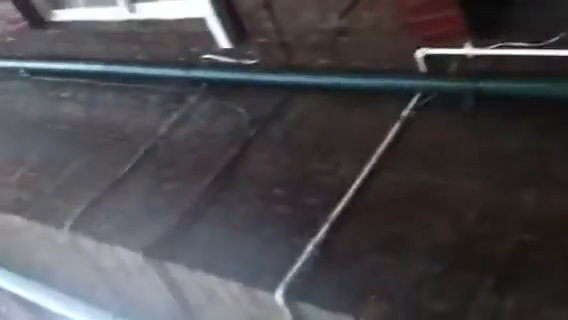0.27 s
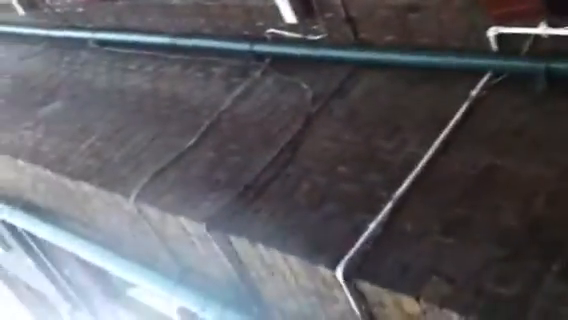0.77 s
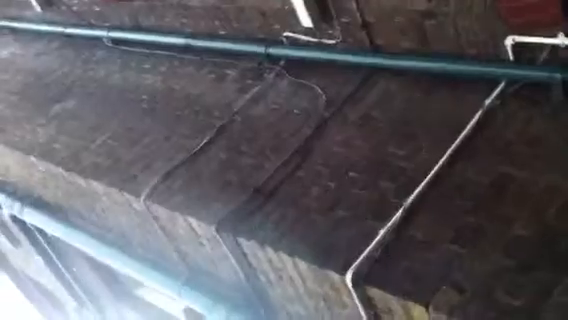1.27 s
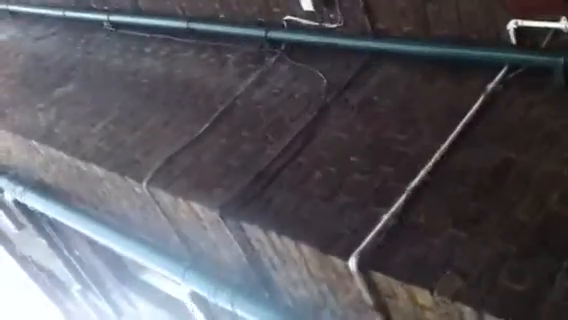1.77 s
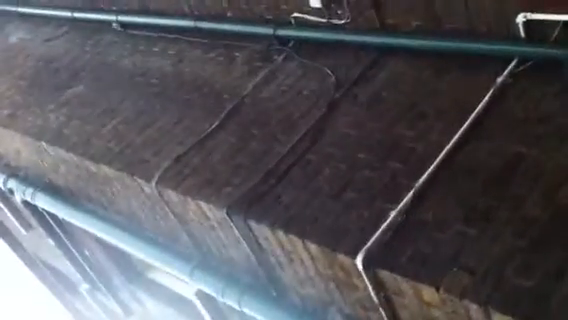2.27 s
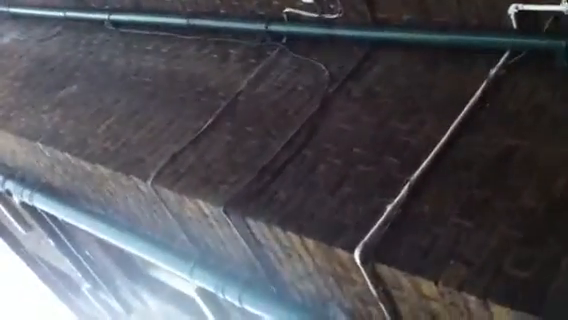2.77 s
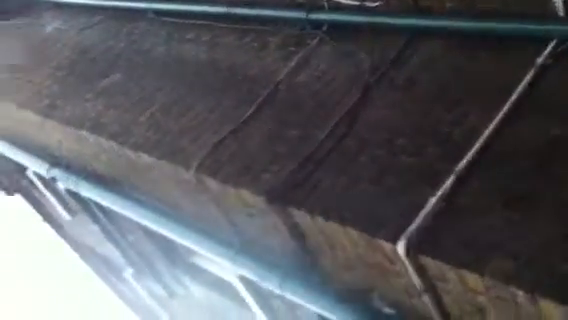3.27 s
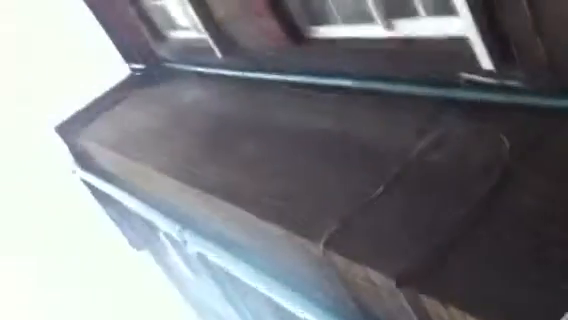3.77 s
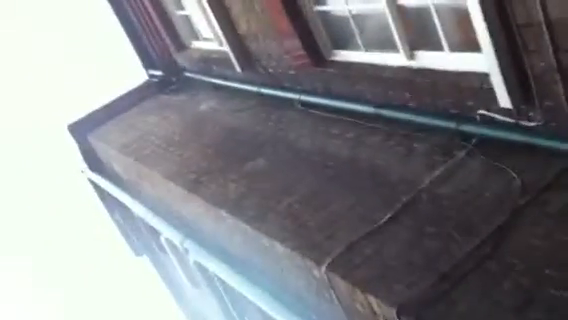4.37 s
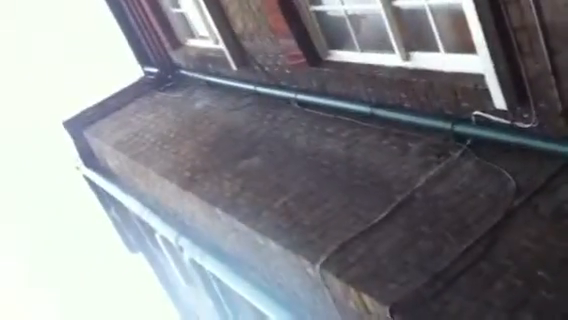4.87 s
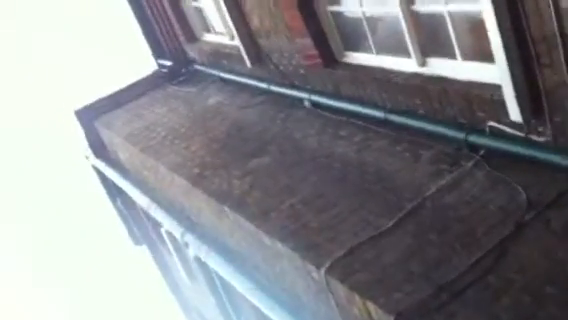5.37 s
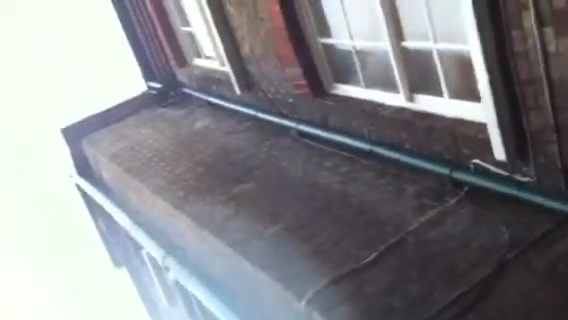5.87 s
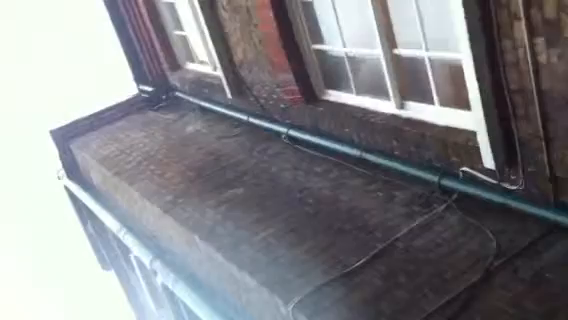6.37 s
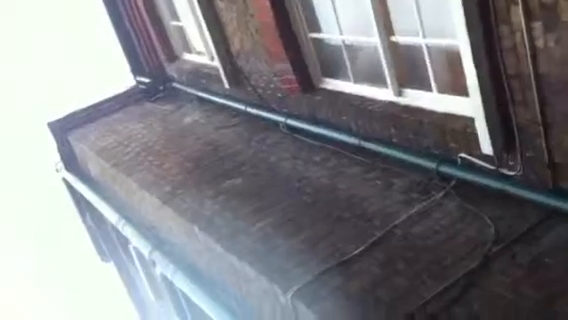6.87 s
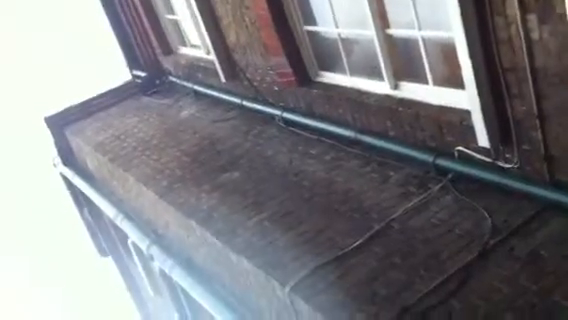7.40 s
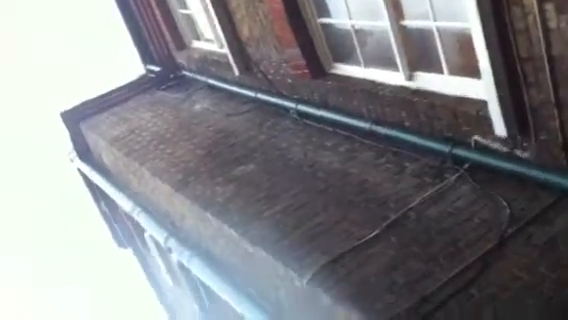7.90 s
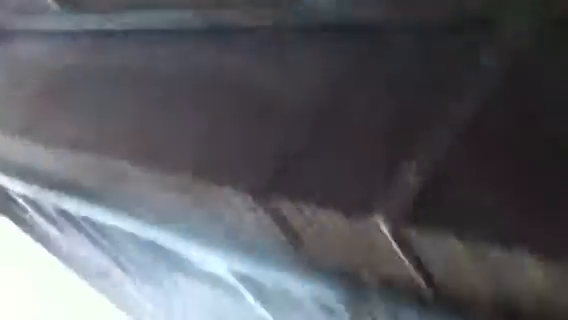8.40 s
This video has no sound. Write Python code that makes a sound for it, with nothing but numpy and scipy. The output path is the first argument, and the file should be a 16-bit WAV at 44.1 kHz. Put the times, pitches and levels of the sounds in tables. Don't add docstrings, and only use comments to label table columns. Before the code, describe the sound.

In a narrow brick yard, rainwater falls in irregular slugs, slapping the ground and bursting into bright, crackling spray. Fat drops knock a plastic pipe with short hollow tocks. Just before four seconds a drop thumps onto the microphone, and its water film muffles everything: dull slaps, woody knocks, bubbly drips and soft patter continue to the end, with little treble.

```python
import sys
import numpy as np
from scipy import signal
from scipy.fft import rfft, irfft
from scipy.io import wavfile
from scipy.ndimage import uniform_filter1d

SR = 44100
rng = np.random.default_rng(int(sys.argv[2]) if len(sys.argv) > 2 else 0)


def nominal_scale(level):
    x = np.asarray(level, float) / 20
    return 10 ** x


def store_wav(level_fs):
    pcm = np.round(np.clip(np.atleast_2d(level_fs), -1, 1) * 32767)
    wavfile.write(sys.argv[1], SR, pcm.T.astype(np.int16))


N = 381003
WET_AT_S = 3.922

# start_s, peak_db, pitch_hz, upper_mode_db, answer_db
TOCKS = [(0.5227, -15.5, 1360, -10, -13), (0.8781, -27, 1294, -7, -3), (1.2111, -17.5, 1356, -9, -8),
         (1.6631, -8, 1330, -16, -5), (1.7357, -30, 1410, -5, -7), (1.7436, -30, 1400, -2.5, -8),
         (1.918, -26, 1400, -12, -11), (2.0065, -25, 1350, -19, -1.5), (2.7159, -22, 1365, -0.5, -9),
         (2.7267, -15.5, 1334, -10.5, -6), (2.7605, -25.5, 1436, -2.5, 1), (2.9634, -25.5, 1326, -20, 1),
         (3.088, -29.5, 1350, 2, 2), (3.1089, -9, 1368, -4.5, -1), (3.15, -22, 1375, -0.5, -9),
         (3.3465, -35, 1400, -2, -1), (3.5294, -30.5, 1372, -7.5, -17), (3.688, -32, 1361, -12, -11)]
# start_s, peak_db, pitch_hz, upper_mode_db, answer_db
PLINKS = [
    (0.4898, -41.5, 1543, 16.2, -11),
    (6.3064, -23.5, 1345, 2.7, 6),
]
# start_s, peak_db, pitch_hz, answer_db
DULL_TOCKS = [(4.4368, -29.5, 1340, -11.5), (4.912, -12, 1360, 0.5), (4.944, -20, 1337, 0),
              (5.0116, -20.5, 1370, -22), (5.0675, -17.5, 1390, 2), (5.223, -22, 1366, 5.5),
              (5.445, -25, 1308, 4), (5.5004, -22, 1340, 2), (5.8354, -16, 1347, 3),
              (6.341, -19.5, 1385, 3.5), (6.384, -19.5, 1380, 1), (6.412, -27, 1340, 1),
              (6.532, -17.5, 1375, 1.5), (6.8841, -18, 1400, 4), (7.222, -22.5, 1290, 4),
              (7.2816, -24.5, 1320, 1), (7.3146, -14.5, 1360, 0), (7.748, -23, 1320, 0),
              (6.06, -31.5, 1260, -2), (7.808, -30.5, 1370, 0), (7.9673, -33, 1290, 5.5),
              (8.117, -12.5, 1360, 1), (8.1875, -14.5, 1420, 2), (8.2018, -29, 1190, -16),
              (8.526, -30, 1320, -13), (8.5971, -18, 1376, 1)]
# freq_hz, density_db_per_hz
SLAP = [(25, -4), (70, -13), (200, -6.5), (500, -6.5), (900, -4), (1500, -3), (2300, -4), (3100, -15),
        (4500, -33.5)]
# freq_hz, density_db_per_hz
SPRAY = [(2500, -30), (3200, -8), (4300, 0), (6000, 1), (7200, -6.5), (8500, -9), (10500, -19.5)]
# freq_hz, density_db_per_hz
SIZZLE = [(6500, -26), (8500, 0.5), (11000, -5.5), (13500, -1.5), (15700, -11.5), (17500, -3)]
# freq_hz, gain_db
FILM = [(35, -23), (90, -6), (200, -5.5), (600, -3), (1050, 1.5), (1400, -6), (1900, -12), (2500, -19),
        (3200, -22.5), (5000, -26.5), (7500, -33.5), (16000, -43)]


def along(points, hz):
    f, v = np.transpose(points)
    return np.interp(np.log(hz + 1), np.log(f + 1), v)


def coloured(x, spectrum, unit=True):
    gain = nominal_scale(along(spectrum, np.fft.rfftfreq(4096, 1 / SR)))
    cepstrum = irfft(np.log(gain))
    cepstrum[1:2048] *= 2
    cepstrum[2049:] = 0
    pulse = irfft(np.exp(rfft(cepstrum)))
    if unit:
        pulse = pulse / np.linalg.norm(pulse)
    return signal.fftconvolve(x, pulse)[:N]


def droplets(per_s, spread_db, t60_s):
    size_db = spread_db * np.minimum(rng.exponential(size=N), 3.5)
    hits = (rng.random(N) < per_s / SR) * nominal_scale(size_db)
    loud = 2.0 + signal.lfilter([1], [1, -nominal_scale(-60 / (t60_s * SR))], hits)
    x = loud * rng.standard_normal(N)
    return x / np.std(x)


def bursts(start_s, level_db, t60_s, rise_s):
    contour = np.zeros(N + SR)
    for at, db, life in zip(start_s, level_db, np.broadcast_to(t60_s, np.shape(start_s))):
        t = np.arange(int(life * SR) + 1) / SR
        body = nominal_scale(-60 * t / max(life, 0.005))
        crack = 0.047 * nominal_scale(-60 * t / min(life, 0.012))
        contour[round(at * SR):][:len(t)] += nominal_scale(db) * (body + crack) * (1 - np.exp(-t / rise_s))
    return contour[:N]


def damp():
    fade_db_per_s = -0.65
    return nominal_scale(fade_db_per_s * np.minimum(np.arange(N) / SR, WET_AT_S))


def splats():
    # start_s, spray_db, sizzle_over_spray_db, t60_s
    slugs = [(0.025, -31.5, -5.5, 0.2), (0.1386, -19, -1, 0.022), (0.1555, -16.5, 1, 0.071),
             (0.243, -28, 5, 0.064), (0.2642, -15.5, -19, 0.03), (0.4215, -25, -5.5, 0.044),
             (0.5685, -20, 0.5, 0.11), (0.6995, -23.5, 1, 0.044), (0.843, -17.5, 5, 0.07),
             (0.9335, -27, 1.5, 0.093), (1.0122, -24, 1, 0.12), (0.127, -38, -10, 0.022),
             (1.298, -32, -36, 0.093), (1.6266, -22, 0, 0.081), (1.661, -41.5, 22, 0.039),
             (1.967, -41.5, 11, 0.08), (2.004, -21.5, -7, 0.019), (2.0843, -27.5, 1.5, 0.15),
             (2.2545, -19, -3.5, 0.073), (2.3285, -25, -1, 0.047), (2.6474, -28.5, 7, 0.049),
             (2.7254, -17.5, -6, 0.0094), (3.2325, -32, -25, 0.025), (3.2503, -25.5, 9.5, 0.036),
             (3.372, -28.5, 4.5, 0.038), (3.4935, -24.5, 0, 0.039), (3.5895, -26, 7, 0.043),
             (3.6215, -26.5, 3, 0.064), (3.6794, -29, -8, 0.13), (3.8765, -34.5, -4, 0.11)]
    # start_s, spray_db, t60_s
    spatters = [(1.168, -29.5, 0.052), (0.357, -36.5, 0.046), (0.384, -34, 0.11), (0.793, -29, 0.1),
                (0.8769, -33, .024), (0.99, -36, 0.048), (1.1157, -40, 0.13), (1.152, -34, 0.062),
                (1.348, -34.5, 0.037), (1.4215, -38, 0.041), (1.498, -29, 0.091), (1.5783, -32.5, 0.079),
                (1.715, -33, 0.19), (1.872, -39.5, 0.26), (1.984, -32, 0.072), (2.1415, -40, 0.049),
                (2.366, -27, 0.022), (2.601, -32, 0.061), (2.6154, -30.5, 0.107), (2.7795, -31.5, 0.08),
                (2.881, -33, 0.13), (2.8957, -31.5, 0.043), (2.96, -32.5, 0.096), (3.197, -31, 0.12),
                (3.3154, -31, 0.071), (3.442, -33.5, 0.13), (3.5165, -41.5, 0.37), (3.8145, -30, 0.11)]
    # start_s, slap_db, spray_db, t60_s
    dull_slugs = [(4.135, -33.5, -66, 0.37), (4.247, -40.5, -63, 0.17), (4.417, -34, -78.5, 0.07),
                  (4.596, -34.5, -73, 0.059), (4.682, -31.5, -68, 0.044), (4.815, -33.5, -67, 0.24),
                  (5.051, -38.5, -65, 0.23), (5.155, -31, -54, 0.047), (5.338, -35, -61.5, 0.068),
                  (5.441, -36, -66, 0.21), (5.517, -38.5, -65, 0.21), (5.613, -33.5, -72, 0.11),
                  (5.774, -39, -61, 0.045), (5.831, -37, -74, 0.12), (5.892, -35, -70, 0.14),
                  (6.047, -35.5, -69, 0.2), (6.22, -31, -62, 0.081), (6.341, -32.5, -69, 0.054),
                  (6.558, -38, -69, 0.2), (7.041, -30, -65, 0.086), (7.207, -29, -63, 0.098),
                  (7.293, -27.5, -48.5, 0.07), (7.396, -32.5, -69, 0.1), (7.727, -35, -60, 0.071),
                  (8.013, -32.5, -58, 0.12), (8.189, -31.5, -56, 0.084), (8.371, -34, -59.5, 0.12),
                  (8.427, -32, -59, 0.089), (8.494, -33, -68, 0.057), (8.594, -30, -63, 0.057)]
    # start_s, slap_db, t60_s
    dull_spatters = [(4.638, -39.5, 0.1), (5.698, -43, 0.23), (5.965, -42.5, 0.079), (6.307, -38, 0.16),
                     (6.437, -36, 0.076), (6.635, -40.5, 0.059), (6.67, -38, 0.35), (6.881, -35.5, 0.059),
                     (7.021, -55, .08), (7.107, -37, 0.15), (7.607, -36, 0.095), (7.659, -42, 0.29),
                     (7.836, -39.5, 0.19), (8.284, -40, 0.26)]
    # start_s, peak_db
    ticks = [(4.0998, -54), (4.177, -54), (4.254, -54), (4.287, -57), (4.8521, -51), (5.155, -47),
             (5.2237, -51), (5.444, -47), (5.5113, -46), (5.519, -47), (5.5984, -46.5), (5.7535, -49),
             (5.8339, -52), (6.306, -45.5), (6.605, -48), (6.617, -50), (7.042, -45.5), (6.884, -52),
             (7.023, -52), (7.209, -42), (7.218, -45), (7.314, -47), (7.2846, -47), (7.2941, -47),
             (7.396, -41.5), (7.557, -49), (8.116, -40.5), (8.192, -55), (8.3716, -47.5), (8.4849, -54)]
    # freq_hz, density_db_per_hz
    tick_colour = [(1200, -27), (2200, 4), (3200, -9.5), (5500, 5), (7500, -13), (11000, -15)]

    spatter_sizzle_db, dull_spray_db = 0.5, -31
    pipe_spray_db, pipe_sizzle_db, pipe_spray_s = -6, -11, 0.048
    slap_over_spray_db, slap_follows_sizzle = -6.5, 0.21
    snap_db, snap_grows, snap_scatter_db = 5.5, 0.31, 2.5

    dry_rows = slugs + [(s, db, spatter_sizzle_db, t60) for s, db, t60 in spatters]
    dry_rows += [(s - 0.001, db + upper_db + pipe_spray_db, pipe_sizzle_db, pipe_spray_s)
                 for s, db, _, upper_db, _ in TOCKS]
    wet_rows = dull_slugs + [(s, db, db + dull_spray_db, t60) for s, db, t60 in dull_spatters]
    dry_s, dry_spray_db, over_db, dry_t60_s = np.transpose(dry_rows)
    wet_s, wet_slap_db, wet_spray_db, wet_t60_s = np.transpose(wet_rows)
    s, t60_s = np.r_[dry_s, wet_s], np.r_[dry_t60_s, wet_t60_s]

    dry_slap_db = dry_spray_db + slap_over_spray_db + slap_follows_sizzle * over_db
    slap_db = np.r_[dry_slap_db, wet_slap_db + 3]
    sizzle_db = np.r_[dry_spray_db + over_db, wet_spray_db + 24]
    spray_db = np.r_[dry_spray_db - 3, wet_spray_db + 26]

    slap = bursts(s, slap_db, 1.81 * t60_s, 0.0039) * droplets(300, 1.6, 0.011)
    spray = bursts(s, spray_db, t60_s, 0.0015) * droplets(400, 2.2, 0.006)
    sizzle = bursts(s, sizzle_db, 0.68 * t60_s, 0.001115) * droplets(420, 1.2, 0.0045)
    tick_s, tick_db = np.transpose(ticks)
    tick = bursts(tick_s, tick_db + 22.5, 0.034, 0.00091) * rng.standard_normal(N)

    scatter_db = snap_scatter_db * rng.standard_normal((2, len(s)))
    over_spray_db, over_sizzle_db = snap_db + snap_grows * (spray_db + 29.0) + scatter_db
    spray += bursts(s, spray_db + over_spray_db, 0.0045, 0.00033) * rng.standard_normal(N)
    sizzle += bursts(s, sizzle_db + over_sizzle_db, 0.0023, 0.000252) * rng.standard_normal(N)
    sizzle *= damp()
    return (coloured(slap, SLAP) + coloured(tick, tick_colour)
            + coloured(spray, SPRAY) + coloured(sizzle, SIZZLE))


def tocks():
    # pitch_ratio, level_db, death_s
    pipe_modes = [
        (1.017, 4, 0.009),
        (1.452, 2, 0.012),
        (0.834, -7.5, 0.011),
        (1.406, -7, 0.015),
    ]
    delays_s = (0, 0, .006, .0075)
    dull_upper_db, dull_high_answer_db = -17, -13

    drops = TOCKS + PLINKS + [(s, db, hz, dull_upper_db, answer_db) for s, db, hz, answer_db in DULL_TOCKS]
    out, t = np.zeros(N + SR), np.arange(SR // 10) / SR
    swell = (1 - np.exp(-t / 0.00045)) ** 2
    for (s, db, hz, upper_db, answer_db), chance in zip(drops, rng.standard_normal((len(drops), 4))):
        high_db = answer_db + dull_high_answer_db * (s > WET_AT_S)
        own_levels_db = (0, upper_db, answer_db, high_db)
        for (ratio, mode_db, death_s), delay_s, own_db, c in zip(pipe_modes, delays_s, own_levels_db, chance):
            turns = hz * ratio * (1 + 0.02 * c) * t * (1.03 - 4 * t)
            level_db = db + 2.0 + mode_db + own_db - 60 * (t / death_s) ** 2.34
            ring = nominal_scale(level_db) * swell * np.sin(2 * np.pi * turns)
            out[round((s - 0.001 + delay_s) * SR):][:len(t)] += ring
    s, db = np.transpose(drops)[:2]
    wet_crack = bursts(s - 0.001, db - 35.0, 0.023, 0.00097) * rng.standard_normal(N)
    return out[:N] + coloured(wet_crack, SLAP[4:] + [(6000, -25.0)])


def port_hits():
    # start_s, peak_db, pitch_hz, t60_s
    thump = [(3.937, -20, 450, 0.0048), (3.9393, -11, 500, 0.034), (3.9421, 0.5, 383, 0.0089),
             (3.9414, -21, 2070, 0.0085), (3.944, -9, 1060, 0.0098), (3.947, -9.5, 730, 0.006),
             (3.9505, -18, 158, 0.065), (3.9441, -17, 270, 0.0099), (3.958, -24, 515, 0.027),
             (3.975, -39, 240, 0.04), (3.957, -23, 1090, 0.011), (3.964, -30, 1020, 0.011)]
    # start_s, peak_db, pitch_hz
    shifts = [(3.993, -29, 910), (3.999, -25, 650), (4.005, -32, 1000), (4.003, -20.5, 330),
              (4.009, -28.5, 200), (4.093, -37, 250), (4.101, -28, 291), (4.524, -35, 299),
              (4.601, -28.5, 308), (4.642, -33.5, 261), (5.458, -32, 262)]
    thump_smack_db, shift_smack_db, shift_t60_s = -10, -13, 0.0083
    skin_ratio, skin_db, skin_t60_s = 1.96, 2, 0.005

    moves = [(*row, shift_t60_s) for row in shifts]
    moves += [(s, db + skin_db, skin_ratio * hz, skin_t60_s) for s, db, hz in shifts[3:]]
    hits = [(*row, thump_smack_db) for row in thump] + [(*row, shift_smack_db) for row in moves]
    out, t = np.zeros(N + SR), np.arange(SR // 10) / SR
    for s, db, hz, t60_s, smack_db in hits:
        push = np.sin(2 * np.pi * hz * t * (1 - 2.2 * t))
        push *= nominal_scale(10.0 - 60 * t / t60_s) * (1 - np.exp(-t * hz * 5))
        smack = signal.lfilter([0.3], [1, -0.86], rng.standard_normal(len(t)))
        smack *= nominal_scale(smack_db + 6 - 60 * t / (0.5 * t60_s))
        out[round(s * SR):][:len(t)] += nominal_scale(db) * (push + smack)
    return coloured(out[:N], [(20, -22.0), (100, -2.0), (2200, -5.0), (9000, -29.5)], unit=False)


def cracks():
    # start_s, peak_db
    sharp_edges = [(0.0263, -24), (0.126, -22), (0.4893, -32), (0.6254, -18), (0.7936, -28), (0.8435, -6),
                   (0.9895, -24), (1.1164, -33), (1.4985, -27), (1.628, -25), (1.7421, -18), (2.005, -22),
                   (2.602, -34), (2.6155, -29.5), (2.6484, -17), (3.0865, -19), (3.25, -20.5),
                   (3.3453, -31.5), (3.3722, -26), (3.8147, -28.5), (3.8781, -31)]
    # freq_hz, density_db_per_hz
    click_colour = [(1800, -21.5), (2800, -6), (3600, -0.5), (5000, -0.5), (6500, -2), (8500, -19)]
    s, db = np.transpose(sharp_edges)
    pipe_s, pipe_db = np.transpose([row[:2] for row in TOCKS + PLINKS + DULL_TOCKS])
    contour = bursts(s - 0.0005, db - 7, 0.0078, 0.00035)
    contour += bursts(pipe_s - 0.0007, pipe_db - 16, 0.026, 0.0003)
    return coloured(contour * rng.standard_normal(N), click_colour)


def flecks():
    # start_s, peak_db, spray_over_sizzle_db
    fleck_rows = [(0.0473, -26, -5), (0.2234, -29, -10), (0.395, -28.5, 0), (0.4673, -33, -5),
                  (0.606, -21, -10), (0.7472, -39, 0), (0.8524, -12, -8), (0.9213, -25, -6),
                  (1.0464, -41, -4), (1.071, -26, -9), (1.1248, -24, -11), (1.17, -33, -14),
                  (1.3247, -27, -7), (1.347, -25.5, -18), (1.3673, -26, -10), (1.3935, -28.5, -6),
                  (1.4374, -28.5, -4), (1.5589, -33, 1), (1.7977, -33, 2.5), (1.918, -27, -19),
                  (2.171, -30, -15), (2.2014, -35, -14), (2.2154, -41, -4), (2.4733, -34, -12),
                  (2.5047, -40, -14), (2.5925, -31, -15), (2.7576, -32, 0), (2.788, -25, 0.5),
                  (2.835, -31, -2), (2.8674, -37, -8), (2.9836, -29, -18), (3.025, -30.5, -5),
                  (3.1254, -20, -7), (3.2744, -49, -12), (3.3383, -28.5, -3), (3.498, -23, -17),
                  (3.5179, -19, -21), (3.545, -25, -16), (3.709, -33, -10), (3.7898, -39, -4)]
    # start_s, peak_db
    mist_rows = [(0.1376, -14), (0.1555, -7.5), (0.2638, -25.5), (0.384, -30.5), (0.5701, -15),
                 (0.6993, -26), (0.7938, -33.5), (0.8428, -9.5), (0.8774, -34.5), (0.9343, -26),
                 (1.0125, -22), (1.1697, -21.5), (1.3239, -30), (1.3488, -28), (1.4371, -26.5),
                 (1.4975, -30), (1.6261, -19.5), (2.0864, -34), (2.2543, -23), (2.6524, -30), (2.7856, -28),
                 (3.1243, -28), (3.25, -25.5), (3.3717, -34), (3.4976, -31), (3.5897, -21), (3.6217, -26),
                 (3.8142, -21), (3.8771, -30)]
    # freq_hz, density_db_per_hz
    mist_colour = [(9500, -32), (11500, -9), (13500, 4.5), (15700, -2.5), (17500, -4)]
    fleck_db, spray_db, fleck_t60_s, snap_db = -9.5, 2.5, 0.04, 7.5
    mist_db, mist_t60_s, mist_lasts = -8.5, 0.025, 0.5

    s, peak_db, over_db = np.transpose(fleck_rows)

    def burst(level_db):
        contour = bursts(s, level_db, fleck_t60_s, 0.00056)
        contour += bursts(s, level_db + snap_db, 0.0043, 0.000202)
        return contour * rng.standard_normal(N)

    mist_s, mist_peak_db = np.transpose(mist_rows)
    life_s = mist_t60_s * nominal_scale(mist_lasts * (mist_peak_db + 26))
    mist = bursts(mist_s, mist_peak_db + mist_db, life_s, 0.0004) * rng.standard_normal(N)
    sizzle = burst(peak_db + fleck_db)
    spray = burst(peak_db + over_db + spray_db + fleck_db)
    return coloured(mist, mist_colour) + coloured(sizzle, SIZZLE) + coloured(spray, SPRAY)


def drips(count=3):
    # start_s, peak_db, pitch_hz
    drip_rows = [(4.035, -41, 1060), (4.177, -29, 1005), (4.294, -38, 974), (4.374, -41, 1020),
                 (4.542, -35, 950), (4.612, -33, 1210), (5.132, -29, 1090), (5.275, -32, 1067),
                 (5.349, -33, 1213), (5.567, -27, 1050), (5.87, -34, 1130), (6.004, -28, 1110),
                 (6.151, -42, 866), (6.558, -31, 850), (6.606, -25, 1110), (6.67, -31, 904),
                 (6.693, -36, 980), (6.722, -31, 1020), (6.865, -25, 1100), (6.92, -37, 1140),
                 (7.239, -25, 1305), (7.292, -22, 1220), (7.419, -30, 1210), (7.508, -31, 1080),
                 (7.535, -31, 990), (7.556, -39.5, 1060), (7.777, -34, 1190), (8.04, -35, 1280),
                 (8.214, -32, 1090)]
    # start_s, peak_db, pitch_hz
    plops = [
        (1.631, -36, 410),
        (1.696, -35, 1930),
        (4.252, -31.5, 294),
        (6.736, -38, 314),
    ]
    decay_turns, spread_s, splash_db, splash_t60_s = 2.9, 0.0094, -13, 0.087

    out, t = np.zeros(N + SR), np.arange(SR // 20) / SR
    s, db, hz = np.transpose(drip_rows + plops)
    db = db - along(FILM, hz)
    for at, level_db, centre_hz, chance in zip(s, db, hz, rng.random((len(s), count, 2))):
        for k, (late, pitch) in enumerate(chance):
            f = centre_hz * (1 + 0.3 * k * (pitch - 0.5))
            blip = t * f * np.exp(-t * f / decay_turns) * np.sin(2 * np.pi * f * t * (1 + 2.4 * t))
            start = round((at - 0.002 + k * late * spread_s) * SR)
            out[start:][:len(t)] += nominal_scale(level_db - 8.0 - 1.4 * k) * blip
    splash = bursts(s, db + splash_db, splash_t60_s, 0.0018) * rng.standard_normal(N)
    return out[:N] + coloured(splash, [(70, -19)] + SLAP[2:])


def patter():
    # time_s, body_db, mist_db
    dry_levels = [
        (0.0, -45.5, -50),
        (1.62, -43, -50.5),
        (2.63, -52.5, -52),
        (2.82, -43.5, -50),
        (3.72, -49.5, -54.5),
        (3.93, -42, -51.5),
    ]
    # time_s, body_db
    wet_levels = [
        (3.96, -38.5),
        (4.69, -48.5),
        (4.96, -44),
        (6.33, -54),
        (6.46, -41.5),
        (7.832, -57),
        (8.64, -44),
    ]
    s, body_db, mist_db = np.transpose(dry_levels)
    wet_s, wet_body_db = np.transpose(wet_levels)
    t = np.arange(N) / SR
    body = nominal_scale(np.interp(t, np.r_[s, wet_s], np.r_[body_db, wet_body_db + 1.6])) * droplets(120, 4.0, 0.1)
    mist = nominal_scale(np.interp(t, s, mist_db) - 1.0)
    spray = mist * droplets(150, 3.6, 0.015)
    sizzle = mist * damp() * droplets(130, 3.5, 0.056)
    soft = coloured(body, [(70, -21.5)] + SLAP[2:])
    return soft + coloured(spray, SPRAY) + nominal_scale(3.5) * coloured(sizzle, SIZZLE)


def gurgle(level_db, centre_hz, turns, count=520):
    at, pitch, size = rng.random((count, 3)).T[:, :, None]
    t = np.arange(900) / SR
    hz = centre_hz * 2 ** (2.2 * (pitch - 0.5))
    blip = nominal_scale(level_db - 10 * size) * t * hz * np.exp(-t * hz / turns)
    blip = blip * np.sin(2 * np.pi * hz * t * (1 + 6 * t))
    place = (at * N).astype(int) + np.arange(len(t))
    return np.bincount(place.ravel(), blip.ravel(), N)[:N]


def drain(level_db):
    # freq_hz, density_db_per_hz
    rumble = [(20, -22), (60, -14), (130, -3), (320, 0.5), (600, -13.5), (1200, -38.5)]
    return nominal_scale(level_db) * coloured(droplets(25, 4, 0.16), rumble)


def patchy(x, depth_db):
    z = signal.stft(x, nperseg=256)[2]
    field = uniform_filter1d(rng.standard_normal(z.shape), size=3, axis=0)
    field = uniform_filter1d(field, size=7, axis=1)
    return signal.istft(z * nominal_scale(depth_db * field / field.std()), nperseg=256)[1][:N]


def yard(x, count=4):
    # freq_hz, t60_s
    decay = [(200, 1), (1500, 0.43), (5000, 0.27), (14000, 0.28)]
    hz, t, z = signal.stft(rng.standard_normal((count, SR // 2)), SR, nperseg=256)
    tails = signal.istft(z * nominal_scale(-60 * t / along(decay, hz)[:, None]), SR, nperseg=256)[1]
    slot = np.arange(N) // (SR // 9) % count == np.arange(count)[:, None]
    echoes = signal.oaconvolve(slot * x, tails / np.linalg.norm(tails[0]), axes=1).sum(0)
    return np.pad(echoes, (500, 0))[:N]


def scene():
    wall, pipe = splats(), tocks()
    water = patchy(wall + patter(), depth_db=2.5) + gurgle(level_db=-45, centre_hz=953.0, turns=3.3)
    echoes = yard(nominal_scale(-9) * wall + nominal_scale(-14) * pipe)
    small = flecks() + drips() + cracks()
    run_off = drain(level_db=-53.5) + gurgle(level_db=-38.5, centre_hz=1155, turns=1.18, count=1400)
    return (water + pipe + echoes + small + run_off)[None]


def thinned(x, depth_db, from_hz):
    lead = 874
    hz, _, z = signal.stft(np.pad(x, (lead, 2048)), SR, nperseg=256, boundary=None)
    blocks = z.shape[1] // 8 * 8
    z = z[:, :blocks]
    cells = (abs(z[:128]) ** 2).reshape(32, 4, -1, 8).mean(1)
    under_db = 10 * np.log10(cells.max(2, keepdims=True) / (cells + 1e-20))
    loud = cells.sum(0)
    all_under_db = 10 * np.log10(loud.max(1, keepdims=True) / (loud + 1e-20))
    under_db = 0.71 * under_db + 0.35 * all_under_db
    slack_db = np.clip(from_hz / hz[2:128:4], 0, 9)[:, None, None] ** 2 * 8
    slack_db = slack_db + 4.6 * rng.standard_normal(cells.shape[:2] + (1,))
    slack_db = slack_db + 4 * rng.standard_normal((1, cells.shape[1], 1))
    slack_db = slack_db + 2.2 * rng.standard_normal(cells.shape)
    slack_db += 12 * (cells[12:24].mean((0, 2)) < nominal_scale(-160))[:, None]
    keep = np.clip((depth_db + slack_db - under_db) / 3, 0.012, 1).reshape(32, -1)
    z[:128] *= np.repeat(keep, 4, axis=0)
    return signal.istft(z, SR, nperseg=256, boundary=False)[1][lead:lead + N]


def top_cut(x):
    return signal.sosfilt(signal.butter(12, 16640, fs=SR, output="sos"), x)


def record(dry):
    # freq_hz, density_db_per_hz
    hiss_colour = [(60, -25.5), (1000, 3), (5000, -0.5), (8500, -3.5), (10800, -6.5), (13500, -3.5),
                   (17000, -4)]
    # freq_hz, gain_db
    band = [(20, -14), (70, -9.5), (140, -2), (15650, -1.5), (15900, -34), (16600, -44), (16900, -75)]
    t = np.arange(N) / SR
    wet = np.clip((t - WET_AT_S) / 0.025, 0, 1)
    heard = (1 - wet) * dry[0] + wet * coloured(dry[0], FILM, unit=False)
    duck_db = -7 * wet * np.exp(-(t - WET_AT_S) / 1.2)
    hiss = nominal_scale(-64.5) * patchy(coloured(rng.standard_normal(N), hiss_colour), depth_db=1.5)
    mic = coloured(nominal_scale(duck_db) * (heard + hiss) + port_hits(), band, unit=False)
    mix = thinned(mic, depth_db=11.5, from_hz=8900)[None]
    return top_cut(mix)


dry = scene()
out = record(dry)
store_wav(out)
```